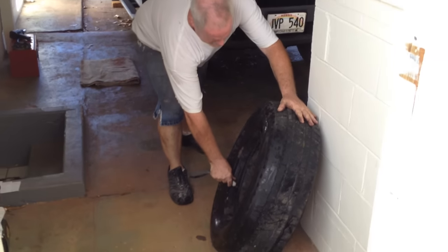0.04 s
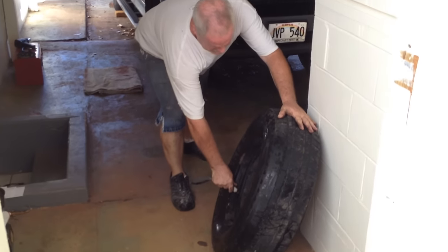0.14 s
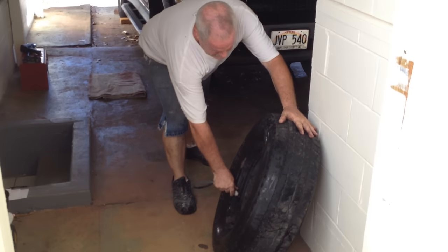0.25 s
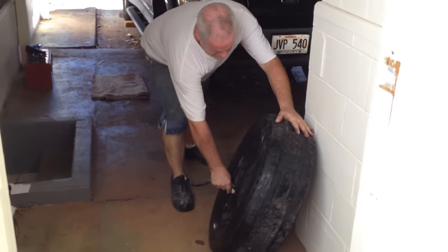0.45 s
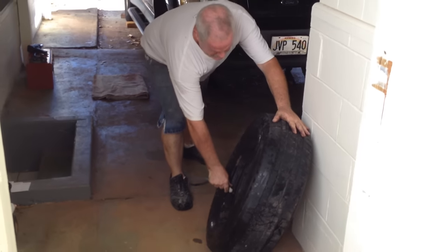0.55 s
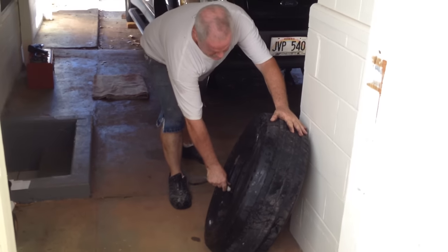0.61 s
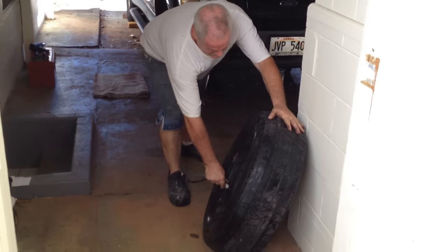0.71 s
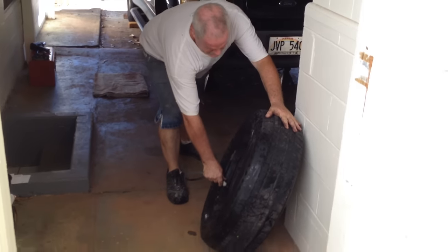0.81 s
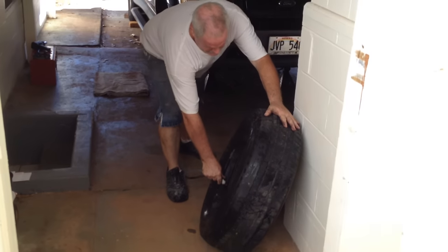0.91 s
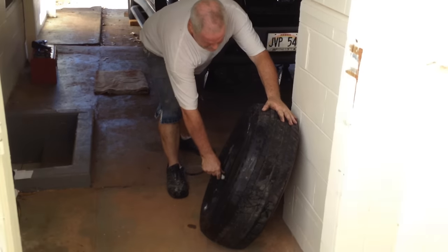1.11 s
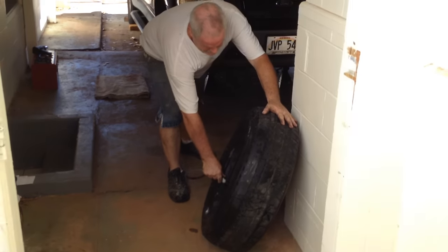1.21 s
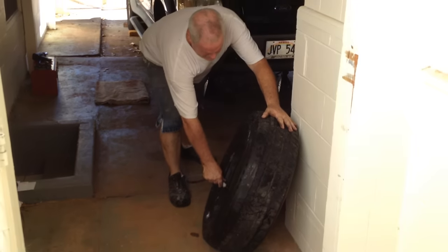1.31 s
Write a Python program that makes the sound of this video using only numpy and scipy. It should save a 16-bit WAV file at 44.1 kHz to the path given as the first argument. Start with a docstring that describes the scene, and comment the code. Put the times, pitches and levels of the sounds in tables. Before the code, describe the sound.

Two heavy thuds from a large tire being inflated, with faint air hissing throughout.

```python
"""A big tire being filled with air, heard on one microphone in a concrete garage.
Air hisses through the valve and sings faintly in the casing. Twice the tire thuds, most likely as its
beads jump onto the rim: a push of air, a slap of rubber, a ringing wheel, a short echo off the walls.
The recorder's gain control ducks the hiss after each thud."""
import sys
import numpy as np
from scipy import signal
from scipy.fft import rfft, irfft
from scipy.io import wavfile
from scipy.ndimage import uniform_filter1d

SR = 44100
rng = np.random.default_rng(int(sys.argv[2]) if len(sys.argv) > 2 else 0)


def wav_record(signal):
    """Record a signal, one row per channel, as 16-bit PCM in the file named by sys.argv[1]."""
    frames = np.transpose(np.atleast_2d(signal))
    bounded = np.clip(frames, -1, 1)
    # unit amplitude maps onto the largest positive 16-bit level
    quanta = np.round(bounded * 32767).astype(np.int16)
    wavfile.write(sys.argv[1], SR, quanta)


N = 59535

# the two thuds: start_s, push_db, slip_db, slap_delay_s, reverb_swell_s, boom_hz, boom_db, echo_db
THUDS = [(0.2388, -6, -12, 0.00023, 0.0044, 238, -13, -7),
         (0.9976, 1, -18, 0.0028, 0.012, 283.4, -5.5, -8.5)]
# dull spectrum of the sidewall's shove: frequency_hz, gain_db
SIDEWALL_SPECTRUM = [(30, 13.5), (85, 1), (150, 22), (260, 38.5), (500, 24), (1000, 27), (1500, 18),
                     (1900, 14), (3000, 2.5), (4500, -17), (6500, -28), (16000, -34)]
IMPACT_RISE_S, RING_RISE_S = 0.00087, 0.013
SLIP_LEAD_S = 0.003013  # the rubber starts to slide this long before each thud


def valve_hiss():
    """Air rushes through the valve; crowded casing resonances ripple its spectrum."""
    spectrum = [(30, -54), (80, -29), (120, -6), (170, -3.5), (300, 2.5), (550, -8), (1000, -5), (1450, -8),
                (1750, -2), (2600, -2.5), (3400, 0.5), (4000, -0.5), (4900, 3.5), (5900, -4.5), (7000, 0),
                (8400, 0), (10000, -2), (15500, -1)]  # the air jet: frequency_hz, density_db
    ripple_depth = [(100, -5.5), (500, 1), (1200, 4.5), (3500, 2.9), (6000, 2.2), (15000, -2.3)]  # colouring by the casing: frequency_hz, depth_db
    flow = [(0, 0), (.2, 1), (.235, 4.5), (.4, -1), (.56, -0.5), (.62, 0.5), (.98, -1), (1.06, -4.5),
            (1.35, -1.5)]  # rise and fall of the hiss: time_s, gain_db
    hiss_db, ripple_spacing_hz = -38, 34.94
    t, hz = np.arange(N) / SR, np.fft.rfftfreq(N, 1 / SR)
    ripple = np.interp(hz / ripple_spacing_hz, np.arange(len(hz)), rng.standard_normal(len(hz)))
    gain = amp(read(spectrum, hz) + read(ripple_depth, hz) * ripple)
    hiss = unit(irfft(rfft(rng.standard_normal(N)) * gain, N))
    return hiss * amp(hiss_db + np.interp(t, *np.transpose(flow)))


def casing_song():
    """The hiss excites narrow resonances that change each time the tire shifts on the rim."""
    # resonances around the thuds: centre_hz, width_hz, before_db, between_db, after_db
    resonances = [(220, 42, -73, -70, -48), (316, 30, -59.5, -78, -58), (889, 25, -61.5, -55, -60),
                  (1015, 15, -61.5, -70, -75), (1190, 20, -56, -58.5, -84), (1350.3, 13, -53.5, -77, -82),
                  (1728, 11, -57.5, -65, -55.5), (3388, 16, -55, -58, -68), (3425, 30, -55.5, -56.5, -57),
                  (3570, 29, -54, -62.5, -78), (4053, 70, -55, -57, -72), (4766, 120, -54.5, -61, -87),
                  (8310, 1300, -65, -51.5, -53)]
    t, hz = np.arange(N) / SR, np.fft.rfftfreq(N, 1 / SR)
    thuds_so_far = sum((t > start).astype(int) for start, *_ in THUDS)
    out = np.zeros(N)
    for centre, width, *levels in resonances:
        peak = 1 / (1 + ((hz - centre) / width * 2) ** 2)
        out += shaped_noise(N, peak) * uniform_filter1d(amp(levels)[thuds_so_far], size=900)
    return out


def thud(index, push_db, slap_delay_s, swell_s, boom_hz, boom_db, echo_db):
    """The sidewall shoves the air and booms, rubber slaps the rim, the wheel rings, the garage answers."""
    t = np.arange(SR) / SR
    boom_t60_s = 0.06
    shove = amp(push_db) * colour(signal.unit_impulse(SR), SIDEWALL_SPECTRUM)
    boom = amp(boom_db - 60 * t / boom_t60_s) * np.sin(2 * np.pi * boom_hz * t + np.pi / 4)
    push = -shove - boom * np.minimum(t / IMPACT_RISE_S, 1)
    out = push + amp(echo_db) * wall_echoes(push)
    add(out, slap_delay_s, rubber_slap(t, index))
    return out + wheel_ring(t, index) + garage_reverb(t, index, swell_s)


def rubber_slip():
    """Rubber slides on the rim: a short, dull rub that peaks as the thud begins."""
    t = np.arange(0, 2 * SLIP_LEAD_S, 1 / SR)
    rub = colour(rng.standard_normal(SR), SIDEWALL_SPECTRUM)[:len(t)]
    return unit(rub) * np.sin(np.pi * t / SLIP_LEAD_S / 2) ** 2


def rubber_slap(t, index, fall_s=0.002):
    """Rubber hits the rim in a brief burst of noise."""
    spectra = [(60.5, -12, -1), (300, 17, 9), (1170, 24.5, 21), (1450, 6, 17.5), (1900, 21.5, 22),
               (2130, 14, 7.5), (2640, 10.5, 16), (3500, 11.5, 9.5), (4000, 2, 1), (4480, 17, -7),
               (5630, -6, -5), (8000, -11, -16), (16000, -11, -20)]  # colour of the slap: frequency_hz, first_thud_db, second_thud_db
    burst = rng.standard_normal(len(t)) * (1 - np.exp(-t / IMPACT_RISE_S)) * np.exp(-t / fall_s)
    return colour(burst / np.linalg.norm(burst), thud_spectrum(spectra, index))


def wheel_ring(t, index):
    """The struck wheel and casing ring in decaying modes."""
    modes = [(151.5, 0.36, -22, -26.5), (229.1, 0.32, -14, -16.5), (313, 0.36, -10.5, -36),
             (414.3, 0.26, -6.5, -19), (498, 0.36, -23, -19), (510.6, 0.18, -23.5, -24),
             (537.4, 0.39, -19.5, -20), (706, 0.3, -18.5, -28), (737, 0.51, -22.5, -24),
             (881.4, 0.18, -13.5, -38), (1006, 0.22, -16, -27), (1053, 0.21, -19.5, -28),
             (1120, 0.12, -14, -29), (1250, 0.48, -27, -26)]  # their modes: pitch_hz, t60_s, first_thud_db, second_thud_db
    ring = np.zeros(len(t))
    for hz, t60, *levels in modes:
        ring += amp(levels[index] - 60 * t / t60) * np.sin(2 * np.pi * (hz * t + rng.random()))
    return ring * (1 - np.exp(-t / RING_RISE_S))


def cavity_tones():
    """The air inside the tire, struck by a thud, dies down to faint tones that the flow keeps alive."""
    # tones of the enclosed air: start_s, end_s, pitch_hz, t60_s, struck_db, held_db, fade_db_per_s
    tones = [(.24, .99, 201.1, 0.64, -17, -60, 16), (.24, 0.9, 902, 0.38, -23, -47, 18),
             (1.001, 1.39, 200.2, 0.56, -16, -39.5, 7.5), (1.0, 1.39, 860, 0.55, -20, -43.5, 5)]
    release_s, waver_step_s, waver_db, wander_cycles = 0.04, 0.0517, 1.4, 0.083
    out = np.zeros(N)
    for start, end, hz, t60, struck_db, held_db, fade_db_per_s in tones:
        t = np.arange(0, end - start, 1 / SR)
        waver = waver_db * drift(t, waver_step_s)
        wander = wander_cycles * drift(t, waver_step_s)  # the pitch wanders a little
        level = amp(struck_db - 60 * t / t60) + amp(held_db - fade_db_per_s * t + waver)
        gate = (1 - np.exp(-t / RING_RISE_S)) * np.minimum((t[-1] - t) / release_s, 1)
        add(out, start, level * gate * np.sin(2 * np.pi * (hz * t + rng.random() + wander)))
    return out


def wall_echoes(push, low_cut_hz=169):
    """The walls throw the push back without its deepest bass."""
    reflections = [(0.0131, -7.5), (.0162, -10), (0.0523, 0.5)]  # early echoes: delay_s, gain_db
    thrown = signal.sosfilt(signal.butter(2, low_cut_hz, "highpass", fs=SR, output="sos"), push)
    out = np.zeros(len(push))
    for delay, db in reflections:
        add(out, delay, amp(db) * thrown)
    return out


def garage_reverb(t, index, swell_s, block=1050):
    """Dense reflections off the concrete swell and then die band by band."""
    decay = [(60, 0.26), (200, 0.57), (500, 0.39), (1200, 0.44), (2500, 0.43), (5000, 0.3), (12000, 0.17)]  # reverberation time: frequency_hz, t60_s
    spectra = [(30, 1, -8), (80.5, 3, 5), (128, 20, 13.5), (176, 23.5, 28), (256, 32, 30.5),
               (404, 34, 34.5), (705, 24, 29), (1020, 27, 28.5), (1430, 19, 19), (1910, 16, 16),
               (2130, 16, 7.5), (3410, 12, 13), (4030, 12.5, 4.5), (4960, 9, 5.5), (5900, -2.5, -1.5),
               (16000, -16, -18)]  # colour of the tail: frequency_hz, first_thud_db, second_thud_db
    noise = np.concatenate([shaped_noise(block) for _ in range(len(t) // block + 1)])
    hz, frame_s, bands = signal.stft(noise, SR, nperseg=256)
    bands *= amp(-60 * frame_s / read(decay, hz)[:, None])
    tail = signal.istft(bands, SR, nperseg=256)[1][:len(t)]
    tail *= 1 - np.exp(-t / swell_s)
    return colour(tail / np.linalg.norm(tail), thud_spectrum(spectra, index))


def amp(db):
    """Decibels to gain."""
    return 10 ** (np.asarray(db) / 20)


def unit(x):
    """Scales to rms 1."""
    return x / np.sqrt(np.mean(x ** 2) + 1e-20)


def read(points, hz):
    """Reads a table on a log-frequency axis."""
    f, value = np.transpose(points)
    return np.interp(np.log(hz + 1), np.log(f + 1), value)


def add(mix, start_s, sound):
    """Mixes a sound in at a time."""
    part = mix[max(round(start_s * SR), 0):][:len(sound)]
    part += sound[:len(part)]


def colour(x, spectrum, size=4096):
    """Minimum-phase filter from rows of frequency_hz, gain_db."""
    gain = amp(read(spectrum, abs(np.fft.fftfreq(size, 1 / SR))))
    taps = np.fft.ifft(np.exp(np.conj(signal.hilbert(np.log(gain))))).real
    return signal.fftconvolve(x, taps[:size // 2])[:len(x)]


def thud_spectrum(spectra, index):
    """Picks one thud's column of levels."""
    return [(hz, levels[index]) for hz, *levels in spectra]


def shaped_noise(size, magnitude=1):
    """Random-phase noise at rms 1, white unless given a spectrum."""
    return unit(irfft(np.exp(2j * np.pi * rng.random(size // 2 + 1)) * magnitude, size))


def drift(t, step_s):
    """Glides to a new random value at each step."""
    return np.interp(t / step_s, np.arange(100), rng.standard_normal(100))


def scene():
    """Two thuds over the running air, in mono."""
    out = valve_hiss() + casing_song()
    for index, (start, push_db, slip_db, *settings) in enumerate(THUDS):
        add(out, start - SLIP_LEAD_S, amp(slip_db) * rubber_slip())
        add(out, start, thud(index, push_db, *settings))
    out += cavity_tones()
    return out[None]


def record(dry):
    """The recorder: gain control with a slow recovery, soft overload, band limit."""
    threshold_db, slope, attack_s, release_db_per_s = -19.5, 0.64, 0.028, 11
    ceiling, high_cut_hz = 0.9, 15350
    power_db = 10 * np.log10(abs(uniform_filter1d(dry[0] ** 2, size=256)) + 1e-12)
    fall_db = np.arange(N) / SR * release_db_per_s
    peak_db = np.maximum.accumulate(power_db + fall_db) - fall_db  # holds each peak, then sinks
    over_db = np.maximum(peak_db - threshold_db, 0)
    pole = np.exp(-1 / (attack_s * SR))
    ducked = dry * amp(-slope * signal.lfilter([1 - pole], [1, -pole], over_db))
    limited = ceiling * np.tanh(ducked / ceiling)
    lowpass = signal.firwin(511, high_cut_hz, window=("kaiser", 9), fs=SR)
    return signal.oaconvolve(limited, lowpass[None], "same")


dry = scene()
out = record(dry)
wav_record(out)
```